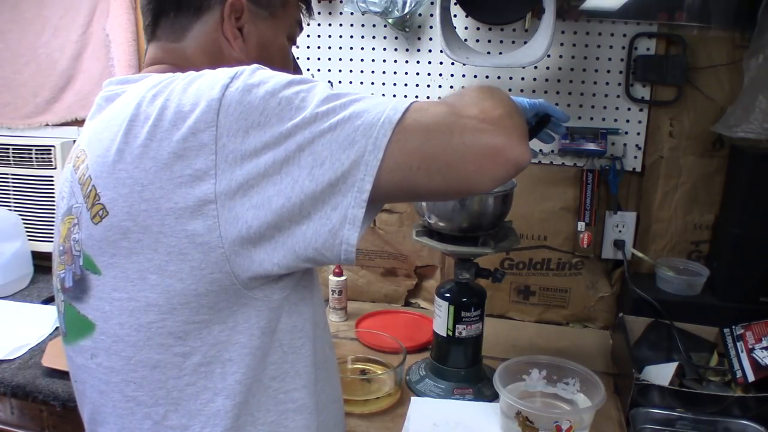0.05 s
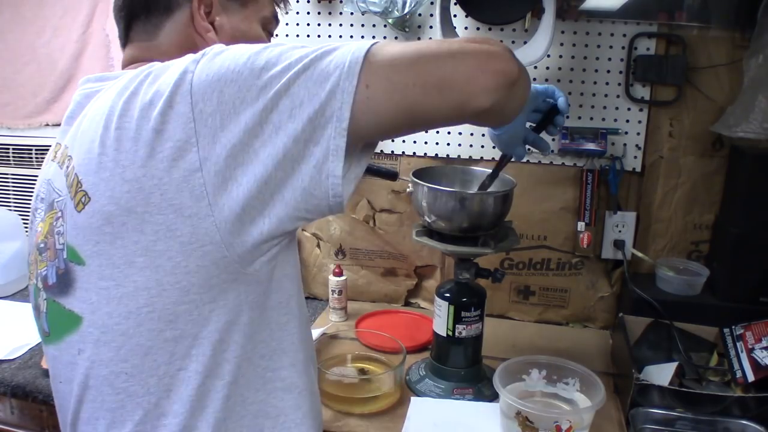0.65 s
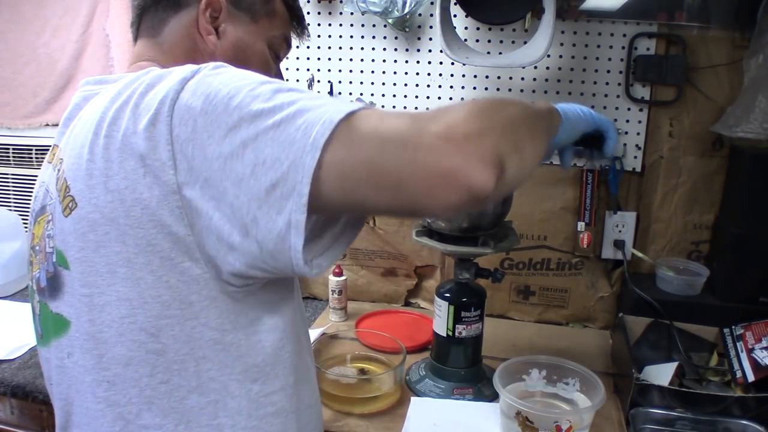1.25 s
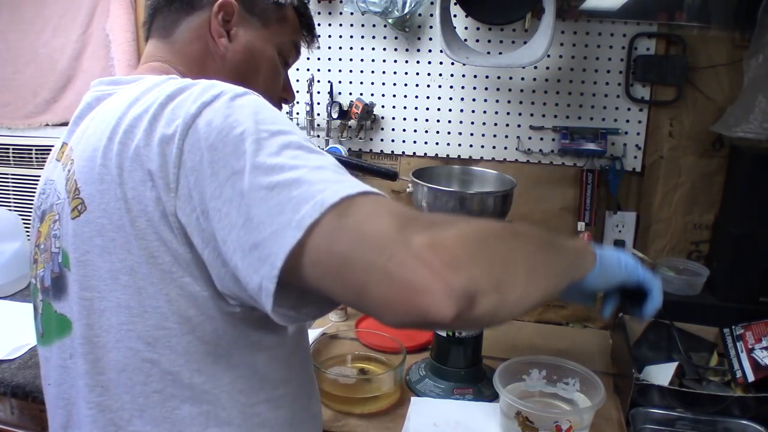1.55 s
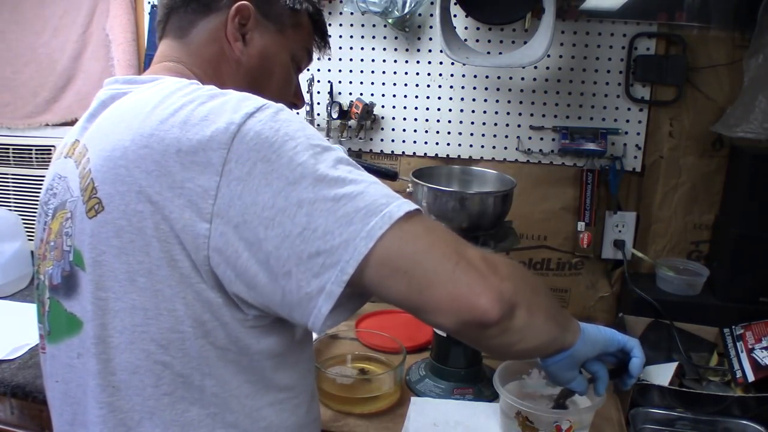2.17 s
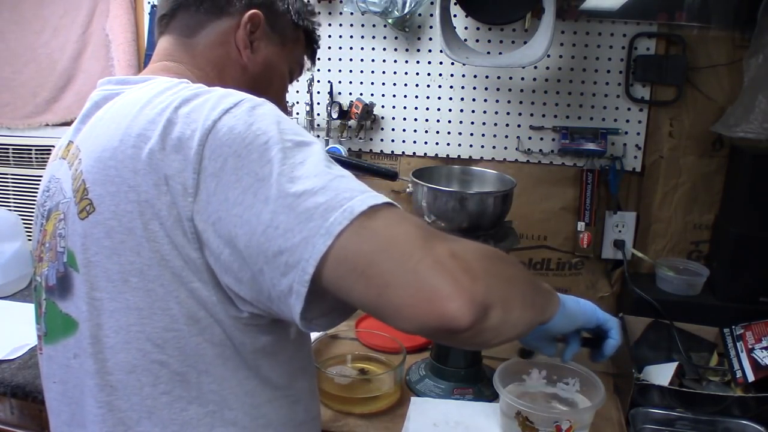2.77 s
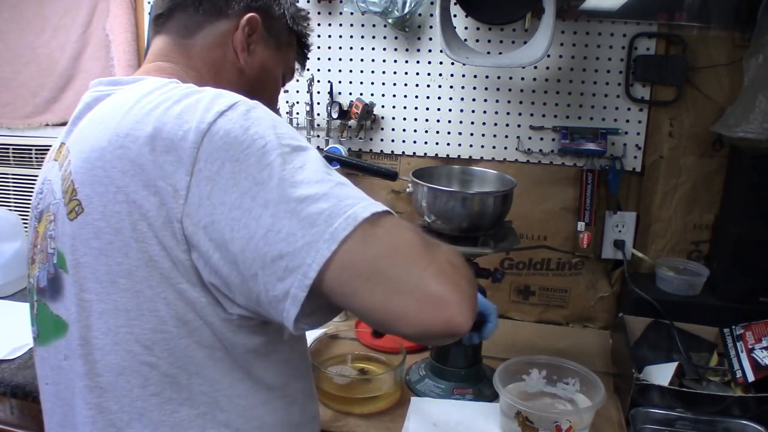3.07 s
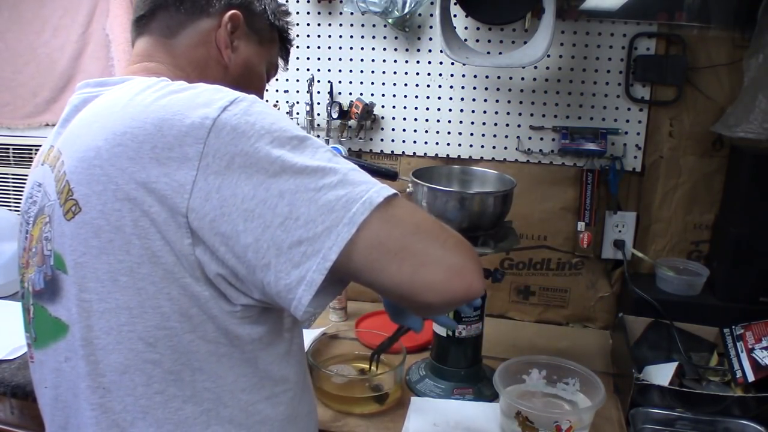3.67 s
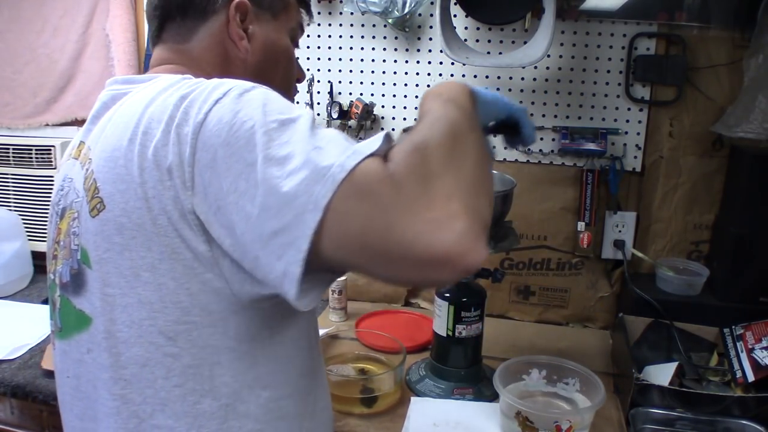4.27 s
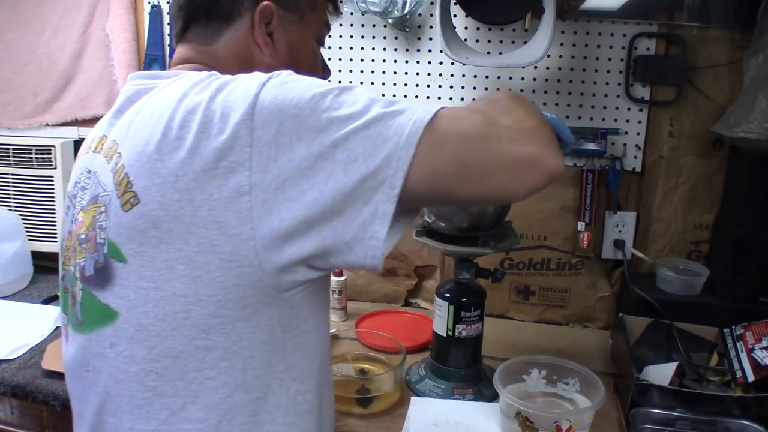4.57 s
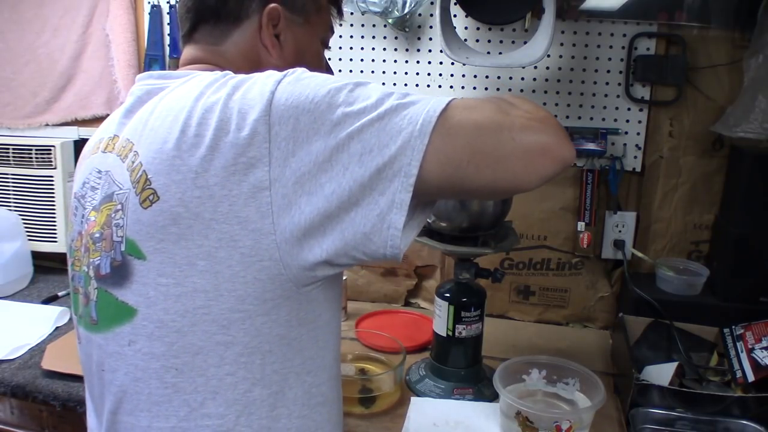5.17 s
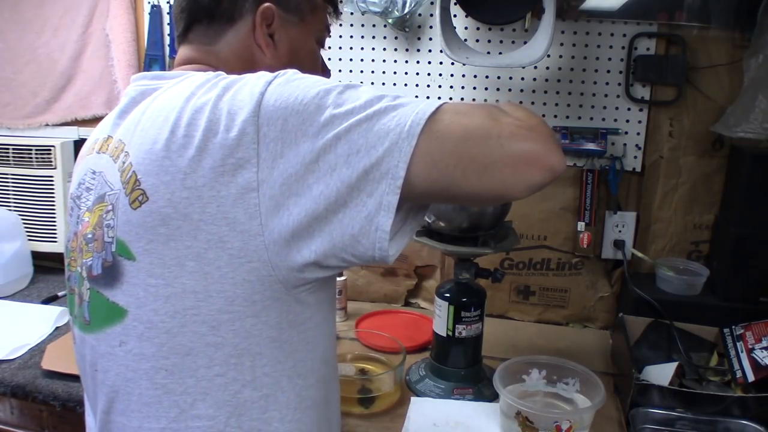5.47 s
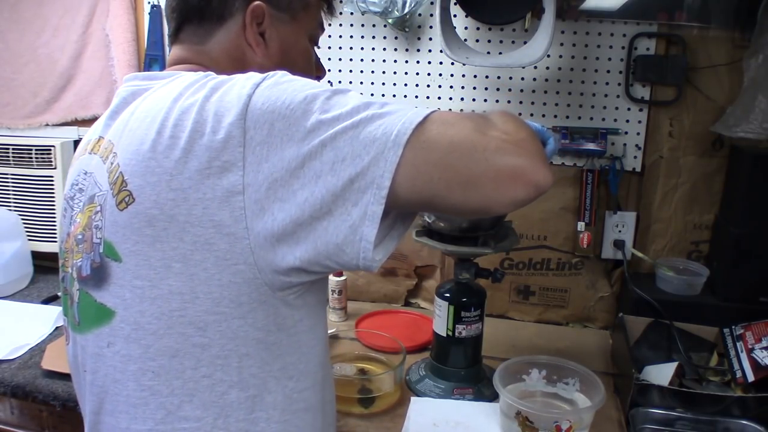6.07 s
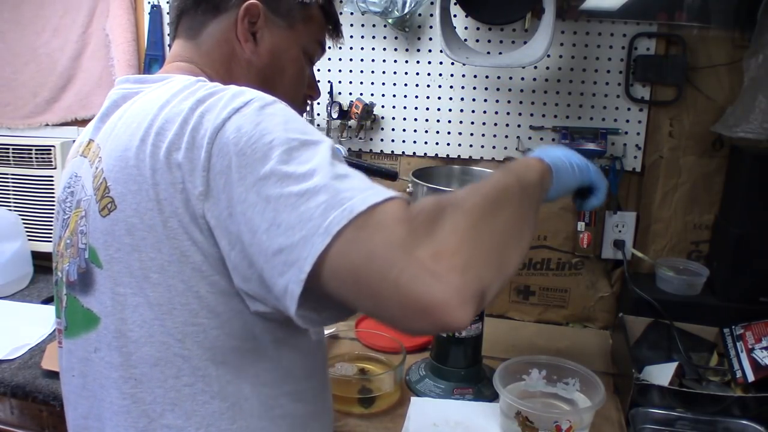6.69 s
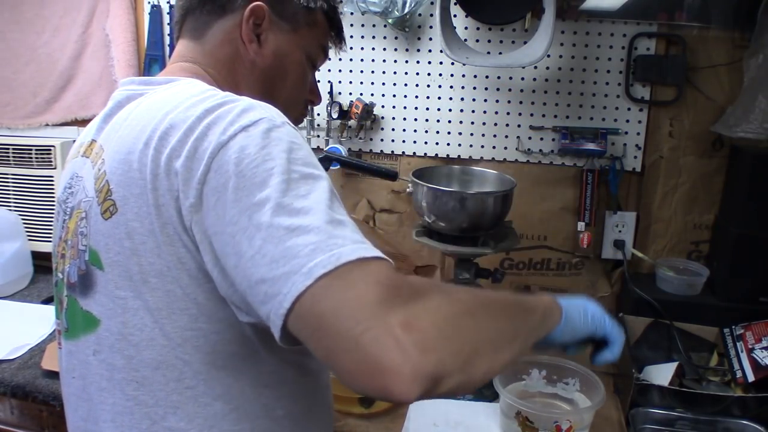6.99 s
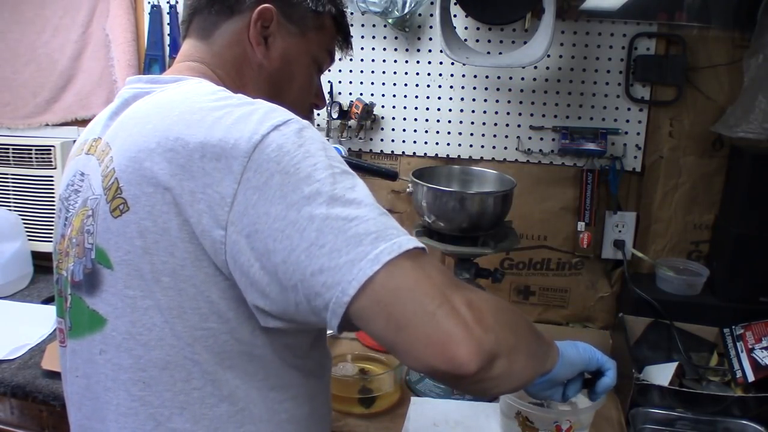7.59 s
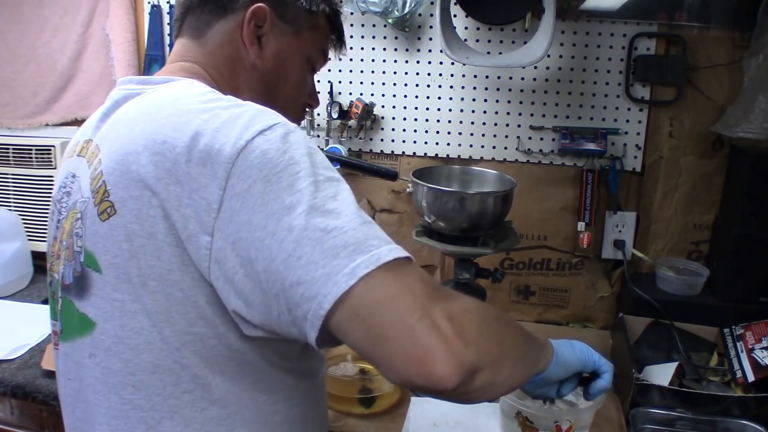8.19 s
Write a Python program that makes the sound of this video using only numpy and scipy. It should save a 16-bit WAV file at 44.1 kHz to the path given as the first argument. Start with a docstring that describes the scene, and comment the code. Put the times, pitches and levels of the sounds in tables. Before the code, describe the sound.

A faint gas burner hiss with a thin whine runs throughout in a small workshop. At the start, metal tongs knock a steel pan and ring with a high tone. A hot bolt sizzles briefly at about 0.5 seconds, followed by a light tap. From 1.8 to 2.6 seconds, small drips and splashes sound as the bolt is rinsed in a tub of water. At 3.6 seconds it drops into a glass dish with a quick, bright, bouncing clink, by far the loudest event. From 4.9 to 6.4 seconds the tongs scrape, rattle and clank in the pan, with a couple of drips near 6 seconds. Water sloshes softly from about 7 seconds, another bolt plunges in with a sharp splash at 7.5, and stirring brings bubbly plops and splashes until about 8.2 seconds. Everything sounds fairly close, with a short room echo.

```python
"""A small workshop: steel bolts are fished from a steel pan with tongs, rinsed in a tub of water and
dropped into a glass dish of oil. Knocks and stick-slip scraping sound the pan; the tongs' arms ring.
Hot steel sizzles; drips and a plunging bolt throw spray and ring air bubbles in the tub.
One bolt rings the glass loudly. A gas burner hisses faintly throughout."""
import sys
import numpy as np
from scipy import signal
from scipy.fft import rfft, irfft
from scipy.io import wavfile

SR = 44100
rng = np.random.default_rng(int(sys.argv[2]) if len(sys.argv) > 2 else 0)


def digitize_waveform(pressure):
    """Quantize a signal to 16-bit integers and store it at the path in sys.argv[1].

    Rows of a 2-D input are taken as channels; values are limited to [-1, 1].
    """
    field = np.atleast_2d(pressure).T
    bounded = np.clip(field, -1, 1)
    quanta = np.round(bounded * 32767).astype(np.int16)
    wavfile.write(sys.argv[1], SR, quanta)


N = 372204
TIME = np.arange(N) / SR


def from_db(db):
    """Decibels to gain."""
    return 10 ** (np.asarray(db) / 20)


def unit_rms(x):
    """Scale to rms 1."""
    return x / np.sqrt(np.mean(x ** 2) + 1e-20)


def unit_energy(x):
    """Scale to energy 1."""
    return x / np.sqrt(np.sum(x ** 2) + 1e-20)


def at_hz(points, hz):
    """Interpolate (freq_hz, value) rows over log frequency."""
    freq_hz, value = np.transpose(points)
    return np.interp(np.log(hz + 1e-9), np.log(freq_hz), value)


def filtered(x, hz, kind, order=2):
    """Butterworth filter."""
    sos = signal.butter(order, np.clip(hz, 10, .47 * SR), kind, fs=SR, output="sos")
    return signal.sosfilt(sos, x + 1e-18)


def noise(spectrum, size=N):
    """Noise shaped by (freq_hz, level_db) rows, rms 1."""
    gain = from_db(at_hz(spectrum, np.fft.rfftfreq(size, 1 / SR)))
    return unit_rms(irfft(rfft(rng.standard_normal(size)) * gain, size))


def resonant_noise(hz, width_hz):
    """Noise through one resonance twice, rms 1."""
    r = np.exp(-np.pi * width_hz / SR)
    section = [1 - r, 0, r - 1, 1, -2 * r * np.cos(2 * np.pi * hz / SR), r * r]
    return unit_rms(signal.sosfilt([section, section], rng.standard_normal(N + SR))[SR:])


def fade(t60_s):
    """One second of exponential decay."""
    return np.exp(-np.log(1000) * TIME[:SR] / t60_s)


def mode(hz, db, t60_s):
    """One second of a struck mode."""
    return from_db(db) * fade(t60_s) * np.sin(2 * np.pi * hz * TIME[:SR])


def through(x, response):
    """Convolve with an impulse response."""
    return signal.oaconvolve(x, response)[:N]


def add(track, start_s, sound):
    """Mix a sound in at start_s."""
    start = int(np.clip(round(start_s * SR), 0, N - 1))
    track[start:start + len(sound)] += sound[:N - start]


def swell(start_s, hold_s, db, attack_s, release_s):
    """Gain of one movement: rise, hold, decay."""
    age_s = TIME - start_s
    release = np.exp(-np.clip((age_s - hold_s) / release_s, 0, 20))
    return from_db(db) * np.clip(age_s / attack_s, 0, 1) * release


def swells(rows, attack_s, release_s):
    """Summed gain of (start_s, hold_s, level_db) movements."""
    return sum(swell(*row, attack_s, release_s) for row in rows)


def chatter(decay_s, per_s):
    """A first contact, then dying random micro-contacts; energy 1."""
    size = SR // 4
    contacts = (rng.random(size) < per_s / SR) * rng.standard_normal(size)
    contacts[0] = 2
    return unit_energy(contacts * np.exp(-TIME[:size] / decay_s))


# Burner and room noise: freq_hz, density_db
AIR_SPECTRUM = [(15, -47.5), (25, -19.5), (53, -14.5), (105, -3.5), (137, -1.5), (236, 1), (624, -2.5),
                (988, -5), (1610, -10.5), (1740, -11.5), (2160, -14), (2350, -11), (3920, -15.5),
                (11300, -25), (16000, -34)]
# Left-right likeness: freq_hz, correlation
AIR_CORRELATION = [(60, 0.83), (120, 0.62), (240, 0.49), (480, 0.48), (950, 0.36), (1890, 0.8),
                   (3770, 0.58), (7520, 0.92), (15000, 0.99)]
# Slow settling: time_s, gain_db
AIR_DRIFT = [(0, 1.5), (1.2, -0.5), (8.4, -1)]
# Steady whistles: pitch_hz, width_hz, level_db
WHISTLES = [(123, 3, -77.5), (241, 8, -82), (1880, 86, -83), (2040, 40, -78.5), (2230, 40, -80.5),
            (11080, 350, -85)]


def burner_air(level_db=-58.5):
    """Gas hiss and room rumble with a few thin whistles."""
    correlation = at_hz(AIR_CORRELATION, np.fft.rfftfreq(N, 1 / SR))
    mid = irfft(rfft(noise(AIR_SPECTRUM)) * np.sqrt(1 + correlation), N)
    side = irfft(rfft(noise(AIR_SPECTRUM)) * np.sqrt(1 - correlation), N)
    hiss = from_db(level_db) * (mid + side * [[1], [-1]]) / np.std(mid)
    drift = from_db(np.interp(TIME, *np.transpose(AIR_DRIFT)))
    whistles = sum(from_db(db) * resonant_noise(hz, width_hz) for hz, width_hz, db in WHISTLES)
    return drift * hiss + whistles


def whine(centre_hz=1796, rms_db=-73, waver_hz=1.5):
    """A faint tone, slightly wavering in pitch."""
    pitch_hz = centre_hz + waver_hz * resonant_noise(hz=3.7, width_hz=8)
    return from_db(rms_db) * np.sqrt(2) * np.sin(2 * np.pi * np.cumsum(pitch_hz) / SR)


# Distinct pan modes: pitch_hz, level_db, t60_s
PAN_MODES = [(189.7, -22, 0.44), (440, -22, 0.1507), (478, -11.5, 1), (610.5, -46, 0.04), (940, -18, 0.07),
             (950, 0.5, 0.13), (1481, 1.5, 0.19), (2150, 12, 0.047), (2800, 15, 0.024), (2980, 7.5, .08),
             (4077, -42, 0.39), (4237, 3.5, 0.23), (4325, 13.5, 0.057), (4990, -31, 0.18), (4900, 8, 0.051),
             (5300, 10, 0.19), (5850, 2, 0.2), (6700, -40.5, 0.16), (7680, -7, 0.3), (8270, -27.5, 0.053),
             (8840, -22, 0.072), (9420, -30, 0.043), (9680, 9, 0.055)]
# Crowd of close modes between them: freq_hz, density_db
PAN_CROWD = [(150, -10.5), (330, -7.5), (550, -1), (900, 6.5), (1250, -3), (1600, 3.5), (2300, -0.5),
             (3400, 1), (4700, 1.5), (6500, 2.5), (8500, 2), (11000, -10), (13000, -18.5), (16000, -24)]
# Tongs and bolts hit the pan: start_s, level_db, body_db, edge_db, chatter_s, grip_hz
KNOCKS = [(0.0, -31, -11.5, 5, 0.012, 4500), (0.2093, -35.5, 2, -6.5, 0.0058, 2230),
          (.699, -44, 0.5, -5, .018, 480), (4.86, -34, 6, 5, 0.0061, 5230),
          (4.878, -30.5, -12, 9.5, 0.024, 5300), (5.115, -44, 11.5, -3, 0.011, 2000),
          (5.153, -24.5, -9.5, 9.5, 0.014, 4640), (5.259, -38, -11, 7, .006, 4400),
          (5.362, -42, 3, 1, 0.016, 940), (5.436, -23.5, -20, 1, 0.0098, 4450),
          (5.516, -18.5, -25, 15, 0.0042, 5460), (5.55, -31.5, -1.5, 12, 0.0066, 7960),
          (5.669, -20, 2, 0, 0.0021, 4880), (5.721, -29, -3, 12, .005, 10070),
          (6.086, -45, 6.5, -9, .002, 2190), (6.158, -26.5, 0.5, 7, 0.019, 4530),
          (6.327, -40, 4.5, -20, .005, 2460), (6.343, -35, -6.5, 6, .008, 5930)]


def pan_knocks(crowd_t60_s=0.071, crowd_db=21, modes_db=15, grip_db=7, grip_oct=0.25, vary_db=3):
    """Each hit wakes its own mix of pan modes, boosted at the pitch of the gripped steel."""
    out = np.zeros(N)
    hz = np.fft.rfftfreq(SR, 1 / SR) + 1
    rings = np.array([(-1) ** k * mode(*row) for k, row in enumerate(PAN_MODES)])
    for start_s, db, body_db, edge_db, chatter_s, grip_hz in KNOCKS:
        # Chatter keeps feeding the crowd, so it holds before it dies.
        power = signal.oaconvolve(chatter(chatter_s, per_s=7500) ** 2, fade(crowd_t60_s) ** 2)[:SR]
        crowd = unit_energy(noise(PAN_CROWD, size=SR) * np.sqrt(np.abs(power)))
        modes = unit_energy(from_db(vary_db * rng.standard_normal(len(rings))) @ rings)
        steel = from_db(crowd_db) * crowd + from_db(modes_db) * modes
        colour_db = at_hz([(900, body_db), (4500, 0), (6500, 0), (11000, edge_db)], hz)
        colour_db += grip_db * np.exp(-.5 * (np.log2(hz / grip_hz) / grip_oct) ** 2)
        clank = irfft(rfft(steel) * from_db(colour_db), SR)[:SR * 3 // 4]
        add(out, start_s, from_db(db) * clank)
    return out


# Arm modes: pitch_hz, level_db, t60_s
TONG_MODES = [(4555, 0, .9), (4612, -8, .5)]
# Louder rings of the arms, already ringing as the scene opens: start_s, level_db
TONG_RINGS = [(0, -15.5), (.699, -35), (5.669, -27)]


def tongs(knock_gain_db=-9):
    """The springy arms ring faintly with each knock, and louder a few times."""
    out = np.zeros(N)
    ring = unit_energy(sum(mode(*row) for row in TONG_MODES))
    knocks = [(start_s, db + knock_gain_db) for start_s, db, *_ in KNOCKS]
    for start_s, db in knocks + TONG_RINGS:
        add(out, start_s, from_db(db) * ring)
    return out


# Spurts on the lifted bolt: start_s, hold_s, level_db
SIZZLES = [(.49, 0.081, -53), (.61, 0.036, -60)]


def sizzle(gain_db=-5.5, pops_per_s=4000, band_hz=(4500, 12500)):
    """Water boils off hot steel in tiny bright pops."""
    pops = (rng.random(N) < pops_per_s / SR) * rng.standard_normal(N)
    spurts = swells(SIZZLES, attack_s=0.044, release_s=0.015)
    return from_db(gain_db) * spurts * unit_rms(filtered(pops, band_hz, "band"))


def bubble(start_hz, t60_s, rise_oct_per_s, attack_s):
    """An air pocket rings, rising in pitch as it nears the surface."""
    age_s = TIME[:SR]
    pitch_hz = start_hz * 2 ** (rise_oct_per_s * np.minimum(age_s, t60_s))
    envelope = fade(t60_s) * (1 - np.exp(-age_s / attack_s))
    return envelope * np.sin(2 * np.pi * np.cumsum(pitch_hz) / SR)


def spray(decay_s, band_hz):
    """Struck water throws a burst of tiny ticks; energy 1."""
    return unit_energy(filtered(chatter(decay_s, per_s=3600), band_hz, "band", order=3))


# Drops into the tub: start_s, level_db, pitch_hz
DRIPS = [(.613, -40.5, 5460), (1.792, -40, 5670), (1.838, -42, 2520), (1.879, -39, 4080), (1.9, -24, 5550),
         (1.905, -35, 1860), (2.18, -39, 5300), (2.255, -41, 2580), (2.289, -34, 3810), (2.406, -41, 5640),
         (2.514, -39, 1995), (2.632, -46, 5230), (5.979, -36, 1470), (6.086, -32.5, 1660),
         (7.161, -41, 3850), (7.406, -32.5, 1194), (7.514, -33.5, 1680), (7.614, -35.5, 2340),
         (7.633, -40, 794), (7.675, -38.5, 800), (7.723, -29, 1090), (7.762, -34.5, 1906),
         (7.858, -31, 2620), (7.952, -34, 559), (7.961, -25.5, 1230), (7.981, -24.5, 520),
         (7.983, -24, 1360), (8.026, -26.5, 1150), (8.052, -25, 1390), (8.073, -31.5, 763),
         (8.123, -27.5, 940)]


def drips(bubble_db=-1, tick_db=-3.5, t60_cycles=46, attack_cycles=0.46):
    """Each drop ticks on the surface and rings a bubble; large bubbles ring longer."""
    out = np.zeros(N)
    for start_s, db, hz in DRIPS:
        ring = bubble(hz, t60_cycles / hz, rise_oct_per_s=7.2, attack_s=attack_cycles / hz)
        tick = spray(decay_s=0.0055, band_hz=(2800, 8800))
        add(out, start_s, from_db(db + bubble_db) * ring)
        add(out, start_s, from_db(db + tick_db) * tick)
    return out


# Furniture resonances: start_s, level_db, pitch_hz, t60_s
THUDS = [(.698, -51.5, 457, 0.32), (3.618, -51.5, 117, 0.1), (3.6816, -50.5, 122, 0.13),
         (4.866, -51, 191.5, 0.93), (5.152, -65, 189, 0.38)]


def thuds():
    """Blows reaching the bench or burner stand ring one low mode each."""
    out = np.zeros(N)
    for start_s, db, hz, t60_s in THUDS:
        add(out, start_s, mode(hz, db, t60_s))
    return out


# Slaps on the water: start_s, level_db, centre_hz
SLAPS = [(1.836, -36, 9000), (1.868, -45, 7800), (1.907, -34, 6400), (2.255, -45, 3480), (2.287, -51, 6950),
         (2.507, -45.5, 6000), (2.632, -45, 4000), (7.157, -43, 11000), (7.404, -44, 7500),
         (7.444, -36.5, 3340), (7.722, -39.5, 5030), (7.6336, -34, 8300), (7.668, -36.5, 7000),
         (7.957, -26, 3100), (8.052, -30, 3700), (8.067, -31, 5800)]


def slaps(gain_db=14, width_oct=1.7):
    """Tongs and bolt slap the water, throwing short bursts of spray."""
    out = np.zeros(N)
    edge_ratio = 2 ** (width_oct / 2)
    for start_s, db, hz in SLAPS:
        burst = spray(decay_s=0.0047, band_hz=(hz / edge_ratio, hz * edge_ratio))
        add(out, start_s, from_db(db + gain_db) * burst)
    return out


# Tongs stir the tub: start_s, hold_s, level_db, median_hz
STIRS = [(1.852, 0.073, -52, 3700), (1.951, 0.14, -60, 2970), (2.241, 0.043, -55, 3450),
         (2.455, 0.065, -52.5, 2800), (7.48, 0.12, -50, 2350), (7.61, 0.16, -50.5, 1390),
         (7.891, 0.061, -43.5, 3070), (7.981, 0.16, -44, 2006)]


def churn(gain_db=-6, bubbles_per_s=330, spread_oct=0.55, t60_cycles=28, vary_db=4, glide=0.037):
    """Stirring raises tiny bubbles of scattered size, each gliding slightly upward."""
    out = np.zeros(N)
    for start_s, hold_s, db, median_hz in STIRS:
        stir = swell(start_s, hold_s, db, attack_s=0.011, release_s=0.028)
        births = np.flatnonzero((rng.random(N) < bubbles_per_s / SR) & (stir > from_db(-80)))
        for birth in births:
            strength, detune = rng.standard_normal(2)
            hz = np.clip(median_hz * 2 ** (spread_oct * detune), 400, 12000)
            life = np.arange(int(t60_cycles * SR / hz)) * hz / (t60_cycles * SR)  # 0 to 1
            phase = 2 * np.pi * t60_cycles * life * (1 + glide * life)
            pop = unit_energy(np.sin(phase) * np.exp(-np.log(1000) * life))
            add(out, birth / SR, stir[birth] * from_db(vary_db * np.clip(strength, -2, 2)) * pop)
    return from_db(gain_db) * np.sqrt(SR / bubbles_per_s) * out


# Dish modes, by where it is struck: pitch_hz, floor_db, wall_db, t60_s
GLASS_MODES = [(662, -50, -48, 1.5), (1516.5, -21, -22, .17), (1520, -41, -39, 1.2), (1549, -30, -30, .14),
               (2200, -42, -34, .1), (2655, -24.5, -23, .33), (2753, -17, -22.5, .14),
               (4090, -27, -38, .04), (4211, -16, -27, .14), (4347, -15, -26, .15), (4377.5, -12, -21, .18),
               (4493, -21, -34, .12), (5249, -20, -14, .15), (5274, -11, -16, .1), (5720, -36, -29, .09),
               (6706, -18, -15, .11), (6750, -21, -19, .15), (6820, -21, -22, .13), (7714, -32, -32, .2),
               (8275, -29, -22, .18), (8406, -27, -19, .11), (8465.5, -25, -14, .17), (9240, -32, -26, .16),
               (10110, -33, -26, .12), (10485, -34, -28, .16), (11570, -40, -30, .15),
               (12090, -40, -32, .15), (12543, -28, -38, .16), (13018, -29, -36, .14),
               (13450, -25, -27, .11), (14219, -17, -28, .15)]
# Bolt hits the dish: start_s, level_db, place (0 floor, 1 wall), damping_db (sign ignored)
GLASS_HITS = [(3.6185, 1.5, 0, -3), (3.6485, -3.5, 0.39, -2), (3.6825, 3.5, 0.91, 6.5),
              (3.697, -14.5, 1, 3), (3.7325, -24, 1, 10.5)]


def glass_dish(ring_db=0.52, clack_db=-18, clack_t60_s=0.16):
    """Each hit of the bolt damps the old ring and starts a new one over a broad clack."""
    out = np.zeros(N)
    clack_noise = noise([(30, -37), (100, -23), (400, -20.5), (900, -13.5), (1800, -6.5), (3500, -3.5),
                         (4300, 9.5), (5800, -5), (8500, 0.5), (11000, -12.5), (14200, -14.5),
                         (15000, -32)])
    for k, (start_s, db, place, damping_db) in enumerate(GLASS_HITS):
        out[round(start_s * SR):] *= from_db(-abs(damping_db))
        ring = sum((-1) ** j * mode(hz, floor_db + place * (wall_db - floor_db), t60_s)
                   for j, (hz, floor_db, wall_db, t60_s) in enumerate(GLASS_MODES))
        clack = clack_noise[k * SR:(k + 1) * SR] * fade(clack_t60_s)
        add(out, start_s, from_db(db + ring_db) * ring + from_db(db + clack_db) * clack)
    return out


def stick_slip(per_s, t60_s):
    """Gain of random slips, each dying quickly; rms 1."""
    slips = (rng.random(N) < per_s / SR) * rng.exponential(1, N)
    return unit_rms(np.sqrt(np.abs(through(slips, fade(t60_s)))))


# Scraped pan resonances: pitch_hz, width_hz, level_db
SCRAPE_MODES = [(185.7, 12.4, -9), (478, 66, -2), (605, 120, -13), (883, 190, -4), (1450, 200, -11.5),
                (2210, 210, -12), (4600, 1700, -10)]
# Strokes of the tongs: start_s, hold_s, level_db
STROKES = [(4.855, 0.05, -50.5), (5.03, 0.13, -56), (5.14, 0.087, -48.5), (5.34, 0.11, -53),
           (5.76, 0.22, -62.5), (6.1, 0.28, -64.5)]


def pan_scrapes(rattle_db=-6):
    """Tongs stick and slip over the pan's bottom; the loose bolt rattles along."""
    slips = stick_slip(per_s=130, t60_s=0.034)
    pan = sum(from_db(db) * resonant_noise(hz, width_hz) for hz, width_hz, db in SCRAPE_MODES)
    rattle = stick_slip(per_s=55, t60_s=0.07) * noise(PAN_CROWD)
    strokes = swells(STROKES, attack_s=0.019, release_s=0.078)
    return strokes * (slips * pan + from_db(rattle_db) * rattle)


# Waves against the tub wall: start_s, hold_s, level_db
WAVES = [(6.94, 0.12, -54.5), (7.25, 0.049, -50), (7.63, 0.039, -53)]


def slosh(gain_db=-3):
    """Waves wake the tub's hollow note."""
    waves = swells(WAVES, attack_s=0.025, release_s=0.054)
    return from_db(gain_db) * waves * resonant_noise(hz=468, width_hz=85)


def plunge(start_s=7.531, splash_db=-7, cavity_db=-22.5):
    """A bolt splashes into the tub; the cavity behind it closes with a rising bloop."""
    out = np.zeros(N)
    splash = spray(decay_s=0.0058, band_hz=(3700, 12000))
    bloop = bubble(start_hz=645, t60_s=0.092, rise_oct_per_s=35, attack_s=0.0058)
    add(out, start_s, from_db(splash_db) * splash)
    add(out, start_s, from_db(cavity_db) * bloop)
    return out


# Bench and wall reflections: delay_ms, level_db
ECHOES = [(1.3, -15), (3.4, -14), (6.1, -18), (10.4, -12), (14.9, -20)]


def workshop(x, tail_db, t60_s, side_db, build_s=0.004, tail_top_hz=13000, gain_db=-2):
    """Early echoes and a short diffuse tail, nearly alike left and right."""
    def tail():
        decay = filtered(rng.standard_normal(SR), tail_top_hz, "low", order=1) * fade(t60_s)
        return unit_energy(decay * (1 - np.exp(-TIME[:SR] / build_s)))
    response = from_db(tail_db) * tail()
    response[0] += 1  # direct sound
    for delay_ms, db in ECHOES:
        response[round(delay_ms * SR / 1000)] += from_db(db)
    side = from_db(side_db) * through(x, tail())
    return from_db(gain_db) * (through(x, response) + side * [[1], [-1]])


def scene():
    """Pan, dish and tub, each with its own reverb, over the burner's hiss."""
    pan = filtered(pan_knocks() + pan_scrapes(), hz=13000, kind="low", order=3)
    pan = workshop(pan, tail_db=-4.5, t60_s=0.28, side_db=-17.5)
    dish = filtered(glass_dish(), hz=14600, kind="low", order=8)
    dish = workshop(dish, tail_db=-6.5, t60_s=0.27, side_db=-18)
    tub = drips() + slaps() + plunge() + slosh() + churn() + sizzle()
    tub = workshop(tub, tail_db=-4, t60_s=0.22, side_db=-20)
    # Small bodies radiate almost no bass.
    pan_and_tub = filtered(pan + tub, hz=105, kind="high", order=3)
    return pan_and_tub + dish + tongs() + thuds() + burner_air() + whine()


def record(dry):
    """Clip the loudest peaks, then cut the top steeply."""
    ceiling, cutoff_hz = 0.92, 15900
    lowpass = signal.ellip(10, .2, 80, cutoff_hz, fs=SR, output="sos")
    return signal.sosfilt(lowpass, np.clip(dry, -ceiling, ceiling))


dry = scene()
out = record(dry)
digitize_waveform(out)
```